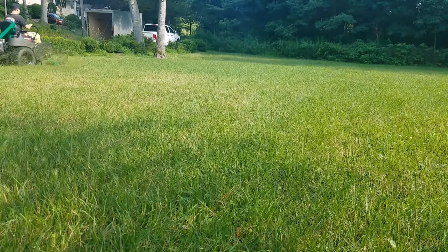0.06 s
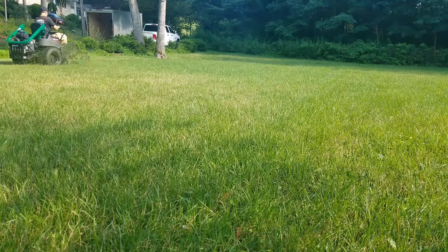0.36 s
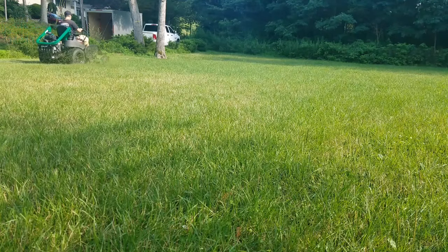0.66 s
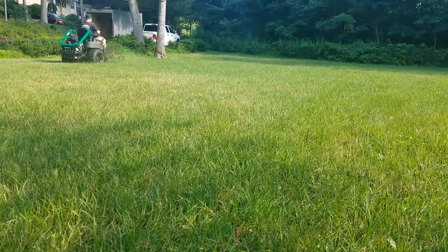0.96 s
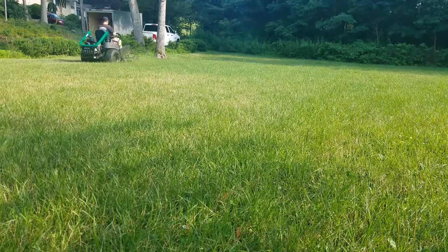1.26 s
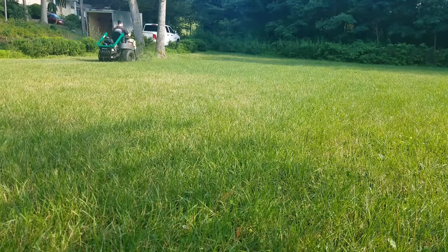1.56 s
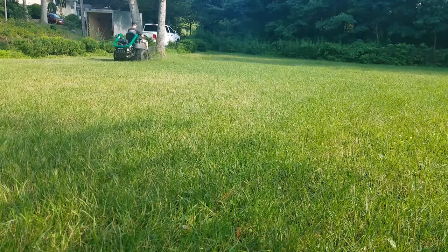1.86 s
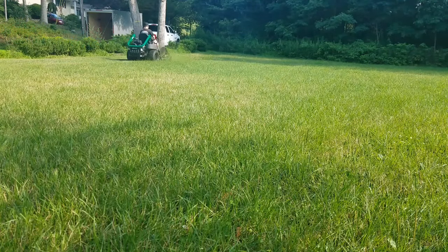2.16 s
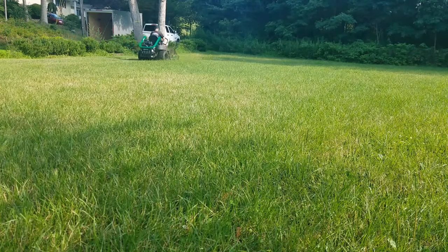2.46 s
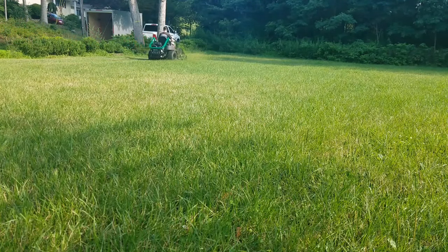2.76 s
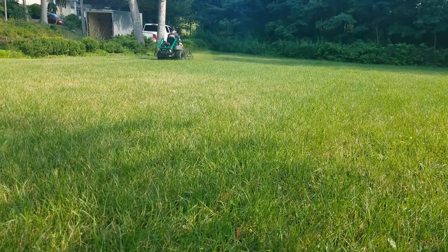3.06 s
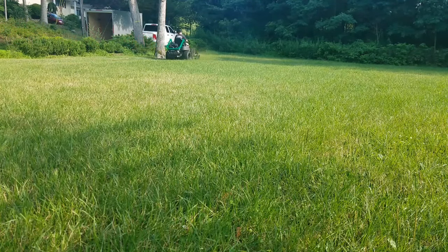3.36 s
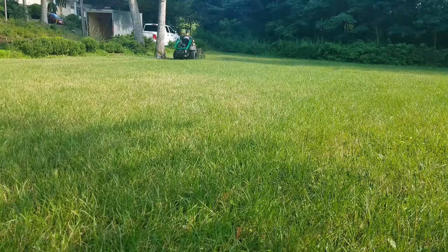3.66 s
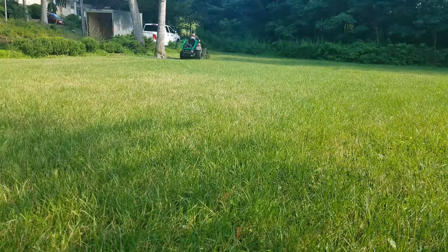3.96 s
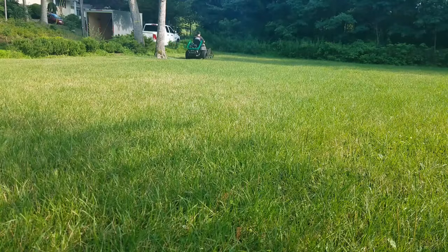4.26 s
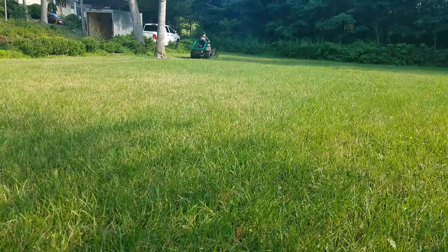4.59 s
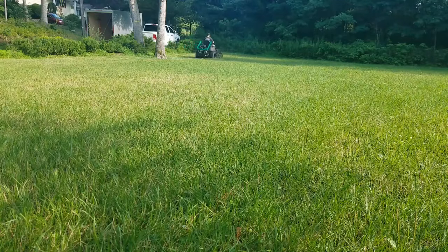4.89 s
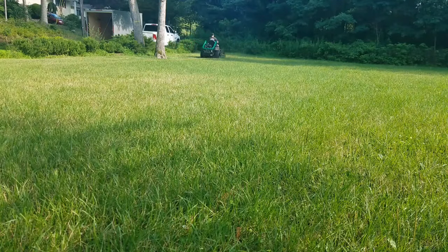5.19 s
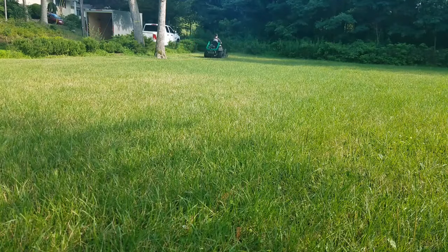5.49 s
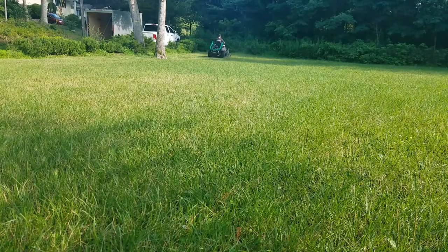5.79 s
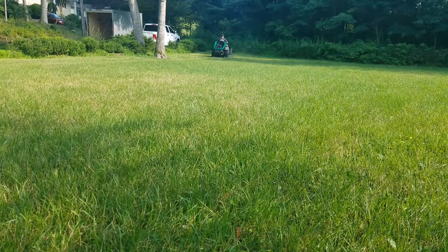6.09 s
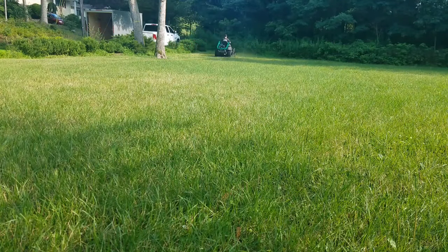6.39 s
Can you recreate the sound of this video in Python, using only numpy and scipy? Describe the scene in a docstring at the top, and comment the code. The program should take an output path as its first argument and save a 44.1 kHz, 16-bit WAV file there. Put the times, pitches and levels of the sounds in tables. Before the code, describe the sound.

A ride-on mower drones and throbs as it drives away across a lawn, grass hissing under its blades.

```python
"""A ride-on mower drones and throbs as it drives away over a lawn, from the left towards the middle.
The drone is its two-cylinder exhaust. The belt-driven blades hum at a little over twice the speed
of the engine's crank and throb against the drone. Air churns in the deck (the cover over the blades),
the fan roars and whines, valves clatter, grass hisses at each blade pass, and a dry twig is chopped.
Trees behind the lawn send faint echoes back to a pair of microphones."""
import sys
import numpy as np
from scipy import signal
from scipy.fft import rfft, irfft
from scipy.io import wavfile
from scipy.ndimage import map_coordinates

SR = 44100
rng = np.random.default_rng(int(sys.argv[2]) if len(sys.argv) > 2 else 0)


def to_wav(sig):
    """Store sig (one row per channel, or 1-D mono) as 16-bit WAV at the path in sys.argv[1].

    Samples outside -1..1 are clipped; the rate is SR.
    """
    pcm = np.clip(np.atleast_2d(sig), -1, 1) * 32767
    pcm = np.round(pcm).astype(np.int16)
    wavfile.write(sys.argv[1], SR, pcm.T)  # frames by channels


N = 284004
TIME = np.arange(N) / SR
START_M, VELOCITY_M_PER_S = (-4.4, 7.0), (0.66, 2.3)  # the mower's straight path: (to the right, ahead)
MIC_SPACING_M, SOUND_M_PER_S, REFERENCE_M = 0.177, 343, 14
BLADE_PASSES_PER_TURN = 2.166
SECOND_FIRING = 270 / 720  # how far through the two-turn engine cycle the second cylinder fires

# Levels in the tables are starting points: the functions add their own gains.
# crank speed, which rises briefly as the load eases: (time [s], speed [turns/s])
CRANK_SPEED = [(0.0, 55.12), (0.7, 55.18), (1.05, 55.38), (1.4, 55.0), (2.4, 54.96), (3.45, 55.68),
               (3.93, 55.46), (4.4, 56.4), (5.08, 55.12), (6.44, 55.4)]
# exhaust and casing tones; the four-stroke cycle gives the halves: (pitch [x crank speed], level [dB])
ENGINE_TONES = [(.5, -57), (1, -35), (1.5, -34.5), (2, -38), (2.5, -24), (3, -28), (3.5, -35), (4, -30.5),
                (4.5, -39.5), (5, -41.5), (5.5, -42.5), (7, -49), (13, -62), (27, -55.5), (33, -60),
                (42, -59), (48, -63), (57, -63), (60, -66)]
# rise and fall of the exhaust drone: (time [s], level [dB])
EXHAUST_LEVEL = [(0.0, 1.5), (0.3, -1.5), (0.7, -5.5), (2.0, 3), (2.75, 3), (3.35, -1), (3.7, 0),
                 (3.95, -5), (4.25, 2), (4.75, -7), (5.3, 0.5), (6.44, -1)]
# the crank's once-a-turn thrum: (time [s], level [dB])
THRUM_LEVEL = [(0.0, 1), (0.9, -4.5), (2.8, 3), (5.2, -0.5), (6.44, -6)]
# tone at 3 x crank speed, as the silencer turns and the ground reflects it: (time [s], level [dB])
THIRD_TONE_LEVEL = [(0.0, 3.5), (0.35, 4), (0.9, -0.5), (1.66, 0), (2.3, -5), (2.88, 3.5), (3.2, 0.5),
                    (3.9, 2.5), (4.1, -4.5), (5.55, 2), (5.88, -6), (6.1, -1.5), (6.44, -3)]
# hum of the passing blades: (time [s], level [dB])
HUM_LEVEL = [(0.0, -14.5), (0.45, -16), (0.7, -20), (1.05, -19.5), (1.45, -14.5), (2.0, -18), (3.15, -24),
             (3.55, -15.5), (3.9, -25), (4.1, -19), (4.9, -14.5), (5.55, -17.5), (5.8, -21), (6.15, -23.5),
             (6.44, -30)]
# the hum's overtones between their swells: (pitch [x blade-pass rate], level [dB])
HUM_OVERTONES = [(2, -38.5), (3, -44), (4, -51), (5, -59)]
# swells as three blades drift in and out of step: (pitch [x blade-pass rate], start [s], end [s], top [dB])
OVERTONE_SWELLS = [(2, -0.3, 0.22, -26.5), (2, 0.4, 1.7, -26.5), (2, 1.9, 2.6, -30), (2, 3, 4.2, -27.5),
                   (2, 4, 5.68, -31), (2, 5.5, 6.4, -28), (3, -0.5, 0.53, -28.5), (3, 0.62, 1.48, -23.5),
                   (3, 1.64, 2.154, -28), (3, 2.5, 3.3, -27.5), (3, 3.5, 4.2, -28), (3, 4.5, 5.16, -30),
                   (3, 5.5, 6.14, -30.5), (3, 6, 6.63, -36.5), (4, -0.7, 0.58, -36.5), (4, 1.04, 1.5, -41),
                   (4, 1.3, 2.2, -37), (4, 2.5, 3.52, -40), (4, 3.5, 4.14, -42), (4, 4.1, 4.95, -41),
                   (4, 4.9, 5.65, -43.5), (5, -0.1, 0.58, -43.5), (5, 1.1, 1.35, -48), (5, 1.3, 1.63, -44),
                   (5, 2.5, 3, -48.5)]
# air churning in the deck: (frequency [Hz], level [dB per Hz])
CHURN_SPECTRUM = [(20, -92), (40, -67), (70, -66.5), (110, -53), (200, -57), (280, -58.5), (340, -55.5),
                  (430, -61), (520, -67.5), (650, -81), (1000, -105), (2000, -120)]
# rush of the deck, which the grass soaks up with distance: (frequency [Hz], level [dB per Hz])
RUSH_SPECTRUM = [(120, -95), (180, -61.5), (230, -69), (450, -73), (560, -70), (680, -74.5), (800, -79),
                 (1200, -78.5), (1550, -78), (2600, -100), (4200, -86), (5000, -88), (6000, -110)]
# how much churn and rush comes straight to the listener: (frequency [Hz], share [0-1])
DECK_DIRECT_SHARE = [(250, .98), (400, .93), (650, .7)]
# air from the side of the deck: (frequency [Hz], level [dB per Hz])
BLAST_SPECTRUM = [(700, -90), (1300, -65), (1900, -79), (2600, -72.5), (3400, -81), (5500, -100)]
# how much of that air's sound comes straight: (frequency [Hz], share [0-1])
BLAST_DIRECT_SHARE = [(1000, .8), (1700, .98), (3000, .95)]
# roar of the fan: (frequency [Hz], level [dB per Hz])
ROAR_SPECTRUM = [(200, -115), (550, -88), (700, -76), (880, -76), (1100, -73), (1500, -74), (2100, -74),
                 (3200, -76), (4200, -78), (5200, -81.5), (8000, -89.5), (13000, -97)]
# how much of the roar comes straight: (frequency [Hz], share [0-1])
ROAR_DIRECT_SHARE = [(600, .55), (1200, .64), (1900, .86), (4200, .88), (5400, .45)]
# fan and flywheel tones, each loudest as one side of the mower faces the listener:
# (pitch before rounding [x crank speed], level [dB], swell time [s], width [s], rise [dB])
WHINE_TONES = [(19.5, -59.5, 1.55, 0.7, 14), (21, -60, 2.3, 0.68, 15.5), (21, -63, 0.43, 0.14, 19),
               (24, -65, 1.15, 0.25, 12), (24, -60, 3.9, 1.8, 11), (27, -62, 1.15, 0.5, 12),
               (30, -58, 4.3, 5, 9.5), (36.06, -62, 0.15, 0.38, 20.5), (36.03, -60, 2.4, 0.85, 14.7),
               (36.1, -70, 5.2, 0.5, 14)]
# valve noise that repeats every engine cycle: (frequency [Hz], level [dB per Hz])
VALVE_SPECTRUM = [(400, -100), (750, -79.5), (1150, -78), (1800, -82), (2900, -73.5), (4000, -100),
                  (7000, -105)]
# hiss of grass being cut: (frequency [Hz], level [dB per Hz])
HISS_SPECTRUM = [(1500, -105), (3500, -111), (5300, -89), (6350, -81.5), (7300, -83), (9800, -84),
                 (11200, -80), (12300, -80.8), (13200, -84.5)]
# how much of the hiss comes straight: (frequency [Hz], share [0-1])
HISS_DIRECT_SHARE = [(4000, 0.12), (9000, 0.07)]
# patches of thick grass that hiss louder: (time [s], width [s], rise [dB])
THICK_PATCHES = [(0.33, 0.073, 1.5), (0.72, 0.073, 0), (1.78, 0.27, 4), (2.7, 0.35, 1.5), (6.15, 0.27, 3.5)]
# bits of twig hit by the blades: (time [s], level [dB])
TWIG_HITS = [(.254, -22), (.262, -20), (0.27, -11.5), (0.2782, -13.5), (.2955, -19), (.3042, -19),
             (.3130, -18), (.322, -21), (.3295, -18), (0.337, -12), (.346, -21), (0.3545, -14), (.371, -22),
             (.380, -20), (.413, -20), (.615, -24), (0.647, -22), (.688, -22), (.854, -25), (1.294, -25),
             (4.647, -28), (6.031, -24)]
# bright crack of dry wood: (frequency [Hz], level [dB])
TWIG_SPECTRUM = [(1000, -36), (4000, 2), (8000, -1), (10000, 6), (12200, 8.5), (13200, 3.5)]


def engine(crank, roar_db):
    """Two unevenly spaced firings push low tones out of the exhaust; high ones ring from the casing."""
    exhaust_db, thrum_db, third_db = curve(EXHAUST_LEVEL), curve(THRUM_LEVEL), curve(THIRD_TONE_LEVEL)
    out = np.zeros(N)
    for multiple, db in ENGINE_TONES:
        turns = multiple * crank
        both_firings = 1 + np.exp(-2j * np.pi * 2 * multiple * SECOND_FIRING)
        phase = np.angle(both_firings) / (2 * np.pi)
        if multiple <= 1:
            out += tone(turns, db + thrum_db, flutter=0.05, per_s=4.7, phase=phase)
        elif multiple <= 2:
            out += tone(turns, db - 0.5, flutter=0.13, per_s=2.8, phase=phase)
        elif multiple < 3:
            out += tone(turns, db + exhaust_db, flutter=0.07, per_s=5, phase=phase)
        elif multiple == 3:
            out += tone(turns, db + third_db, flutter=0.1, per_s=6, phase=phase)
        elif multiple < 8:
            level_db = db + 0.37 * exhaust_db + 0.47 * roar_db - 0.4
            out += tone(turns, level_db, flutter=0.21, per_s=10, phase=phase)
        else:
            out += tone(turns, db + roar_db, flutter=0.7, per_s=22)
    return out


def blade_hum(passes, near_db):
    """Blade tips push pulses of air; slightly unequal blade speeds make the overtones swell and fade."""
    out = tone(passes, curve(HUM_LEVEL) - 0.2, flutter=0.047, per_s=9.2)
    for harmonic, rest_db in HUM_OVERTONES:
        power = np.full(N, gain_of(rest_db) ** 2)
        for which, start, end, top_db in OVERTONE_SWELLS:
            if which == harmonic:
                progress = np.clip((TIME - start) / (end - start), 0, 1)
                arch = abs(np.sin(np.pi * progress)) ** 0.7  # broad tops, brief dips
                power += (gain_of(top_db) * arch) ** 2
        out += np.sqrt(power) * tone(harmonic * passes, db=0.5, flutter=0.035 * harmonic, per_s=20)
    # the two tips of a blade are not quite alike, which adds an in-between tone
    return out + tone(1.5 * passes, near_db - 45, flutter=0.15, per_s=5)


def deck_churn(passes, air_db):
    """Air churns under the deck and pulses gently with each blade pass."""
    return scattered_noise(CHURN_SPECTRUM, DECK_DIRECT_SHARE) * gain_of(air_db) * pulsing(passes, 0.12)


def deck_rush(near_db):
    """Rushing air that fades fast with distance as the grass soaks it up."""
    return scattered_noise(RUSH_SPECTRUM, DECK_DIRECT_SHARE) * gain_of(2.06 * near_db - 1.5)


def side_blast():
    """Air blows from the side of the deck, heard only at the start, while the mower is close."""
    return scattered_noise(BLAST_SPECTRUM, BLAST_DIRECT_SHARE) * swell(0.065, width_s=0.2)


def fan_roar(crank, roar_db):
    """The fan's air noise flickers in gusts, and the crank and valves rasp through it."""
    rasp = pulsing(crank, depth=0.07) * pulsing(3 * crank, depth=0.06)
    air = scattered_noise(ROAR_SPECTRUM, ROAR_DIRECT_SHARE)
    gusts_db = 0.45 * wander(40)
    return air * gain_of(roar_db + 0.1 + gusts_db) * rasp


def fan_whine(crank, near_db):
    """Vanes on the flywheel make thin tones, each in a narrow band of swirling-air noise."""
    out = np.zeros(N)
    for multiple, base_db, time_s, width_s, rise_db in WHINE_TONES:
        turns = round(multiple * 2) / 2 * crank
        db = base_db + 0.5 * near_db + rise_db * swell(time_s, width_s)
        out += tone(turns, db - 5, flutter=0.3, per_s=24)
        out += tone(turns, db - 7, flutter=5, per_s=95)  # so much flutter that it becomes noise
    return out


def valve_clatter(crank, points=1024, count=4):
    """The valves repeat one rattle every two turns; its pattern shifts slowly as the mower moves."""
    place = (crank / 2 % 1) * points
    rattles = [map_coordinates(rng.standard_normal(points), [place], order=3, mode="wrap")
               for _ in range(count)]
    blend = np.array([wander(2.507) for _ in range(count)])
    rattle = (blend * rattles).sum(0) / np.linalg.norm(blend, axis=0)
    return filtered(unit_level(rattle) * np.sqrt(SR / 2), VALVE_SPECTRUM)


def grass_hiss(passes, near_db):
    """Each blade pass cuts a tuft of grass: a short spray of uneven strength."""
    thick_db = sum(db * swell(time_s, width_s) for time_s, width_s, db in THICK_PATCHES)
    hiss_db = -1.9 + 2.05 * near_db + thick_db
    tuft = np.exp(-(passes % 1) / 1.4) * gain_of(4.7 * np.array([wander(130), wander(120)]))
    hiss = scattered_noise(HISS_SPECTRUM, HISS_DIRECT_SHARE)
    return hiss * unit_level(1 + 0.65 * tuft) * gain_of(hiss_db + 0.36 * wander(23))


def twig_snaps(decay_s=0.0008, bounce_db=-8):
    """The blades snap dry wood, with a faint spray of splinters around the first burst."""
    snaps = np.zeros(N)
    for time_s, db in TWIG_HITS:
        age = np.maximum(TIME - time_s, 0)
        snaps += gain_of(db - 4.5) * (age > 0) * np.exp(-age / decay_s)
    splinters = gain_of(-49 + 4.8 * wander(252)) * swell(0.37, width_s=0.13)
    crack, *spray = unit_level(filtered(rng.standard_normal((3, N)), TWIG_SPECTRUM))
    return at_microphones(snaps * crack) + (splinters + gain_of(bounce_db) * snaps) * np.array(spray)


def with_echoes(sound, echo_db, count=12):
    """The direct sound plus echoes from the trees, different at each microphone."""
    out = at_microphones(sound)
    for channel in out:
        delays = rng.integers(SR // 50, SR // 4, count)
        for delay, sign in zip(delays, rng.choice([-1, 1], count)):
            echo = np.pad(sound, (delay, 0), mode="reflect")[:N]
            channel += sign * gain_of(echo_db) / np.sqrt(count) * echo
    return out


def scattered_noise(spectrum, direct_share):
    """Part of a noise comes straight from the mower; the trees scatter the rest, more so with distance."""
    straight, *bounced = filtered(rng.standard_normal((3, N)) * np.sqrt(SR / 2), spectrum)
    hz, share = np.transpose(direct_share)
    direct = filtered(straight, np.c_[hz, 10 * np.log10(share)])
    scattered = filtered(np.array(bounced), np.c_[hz, 10 * np.log10(1 - share)])
    return at_microphones(direct) + scattered * gain_of(-0.9 * nearness_db())


def at_microphones(sound):
    """Direct sound reaches the right microphone a little after the left."""
    _, leftness = position()
    delay = leftness * MIC_SPACING_M / SOUND_M_PER_S * SR
    return np.array([sound, map_coordinates(sound, [np.arange(N) - delay], order=3, mode="nearest")])


def position():
    """The mower's distance in metres, and its direction (0 is straight ahead, 1 is fully left)."""
    right, ahead = (start + speed * TIME for start, speed in zip(START_M, VELOCITY_M_PER_S))
    distance = np.hypot(right, ahead)
    return distance, -right / distance


def nearness_db():
    """Level gained by being closer than the reference distance."""
    return 20 * np.log10(REFERENCE_M / position()[0])


def tone(turns, db, flutter, per_s, phase=None):
    """One tone that flutters on its way through the air; phase is in turns, random if not given."""
    phase = rng.random() if phase is None else phase
    air_path = 1 + flutter * (wander(per_s) + 1j * wander(per_s))
    wave = (air_path * np.exp(2j * np.pi * (turns + phase))).real
    return gain_of(db) * np.sqrt(2 / (1 + 2 * flutter ** 2)) * wave


def wander(per_s):
    """A smooth random wobble of size about 1 that takes a new value per_s times a second."""
    targets = rng.standard_normal(2048)
    times = np.linspace(0, TIME[-1], 2048)
    smooth = map_coordinates(targets, [times * per_s], order=3, mode="wrap")
    return np.interp(TIME, times, unit_level(smooth))


def pulsing(turns, depth):
    """A gain that rises and falls once a turn."""
    return unit_level(np.exp(depth * np.cos(2 * np.pi * turns)))


def swell(time_s, width_s):
    """A bell-shaped rise and fall that reaches 1 at time_s."""
    return np.exp(-0.5 * ((TIME - time_s) / width_s) ** 2)


def filtered(sound, spectrum):
    """Shapes a sound's lows and highs by points of (frequency [Hz], level [dB])."""
    hz, db = np.transpose(spectrum)
    bins = np.fft.rfftfreq(N, 1 / SR)
    return irfft(rfft(sound) * gain_of(np.interp(np.log(bins + 1), np.log(hz), db)), N)


def curve(table):
    """Joins (time [s], value) points with straight lines, one value a sample."""
    return np.interp(TIME, *np.transpose(table))


def unit_level(sound):
    """Scales a sound to an average power of 1."""
    return sound / np.sqrt(np.mean(sound ** 2) + 1e-20)


def gain_of(db):
    """Turns decibels into a number to multiply by."""
    return 10 ** (np.asarray(db) / 20)


def scene():
    """One crank sets the pace of engine, fan and blades; their noises fade as the mower drives away."""
    near_db = nearness_db()
    air_db = 0.16 + 0.55 * near_db + 0.84 * wander(5)
    facing_db = 2 * swell(2.38, width_s=0.92)  # the fan is louder as the mower's back faces the listener
    roar_db = 0.07 + 0.63 * near_db + facing_db
    speed = curve(CRANK_SPEED) * (1 + 0.001174 * wander(22.07))
    crank = np.cumsum(speed) / SR  # turns made so far
    passes = BLADE_PASSES_PER_TURN * crank
    drone = with_echoes(engine(crank, roar_db) + blade_hum(passes, near_db), echo_db=-25)
    metal = with_echoes(fan_whine(crank, near_db) + valve_clatter(crank) * gain_of(roar_db - 4), -12)
    body = (drone + deck_churn(passes, air_db)) * gain_of([[0.8], [-0.8]])  # a little louder on the left
    air = deck_rush(near_db) + fan_roar(crank, roar_db) + side_blast()
    return body + metal + air + grass_hiss(passes, near_db) + twig_snaps()


def record(dry, fade_s=0.004, cutoff_hz=13250):
    """Softens the start and end, and cuts off the highest treble."""
    fade = np.minimum(np.minimum(TIME, TIME[-1] - TIME) / fade_s, 1)
    lowpass = signal.firwin(1023, cutoff_hz, window=("kaiser", 9), fs=SR)
    return signal.oaconvolve(dry * fade, lowpass[None], "same")


dry = scene()
out = record(dry)
to_wav(out)
```